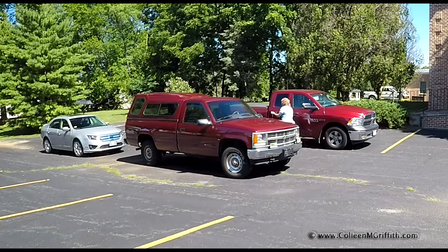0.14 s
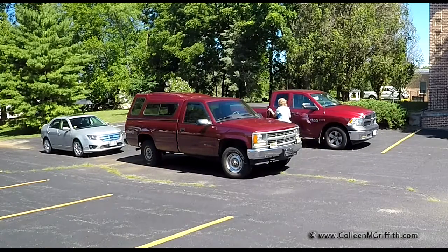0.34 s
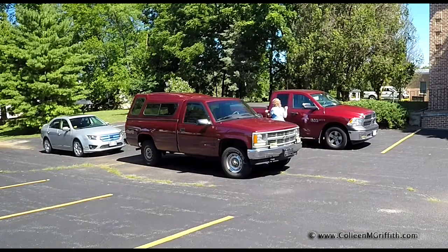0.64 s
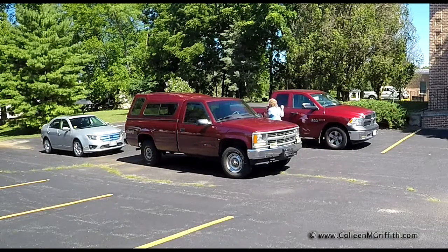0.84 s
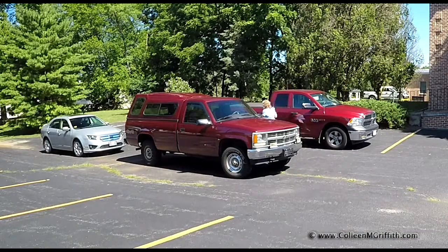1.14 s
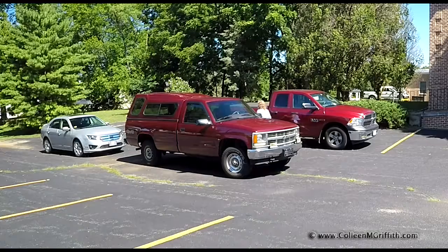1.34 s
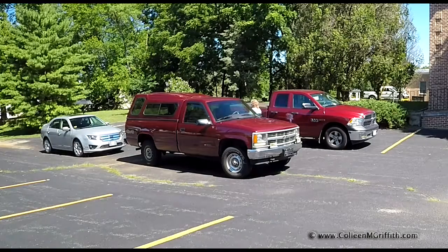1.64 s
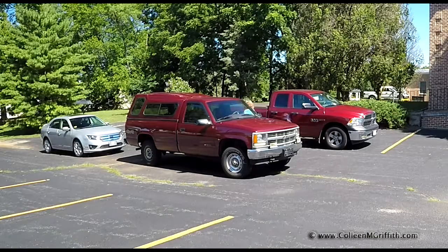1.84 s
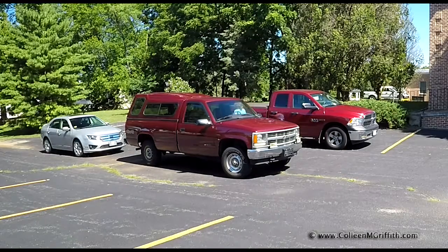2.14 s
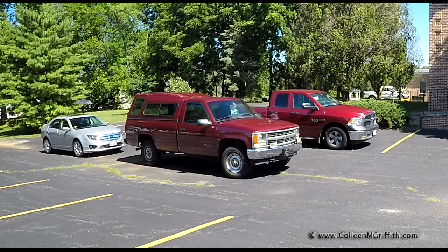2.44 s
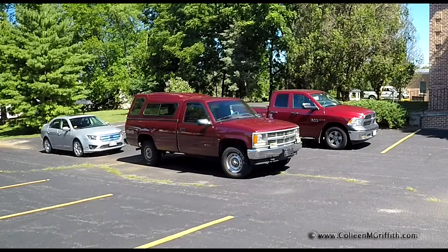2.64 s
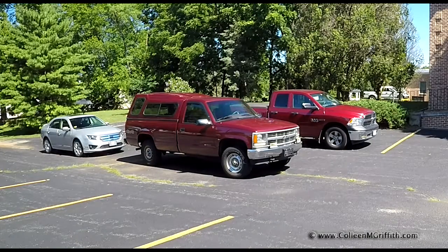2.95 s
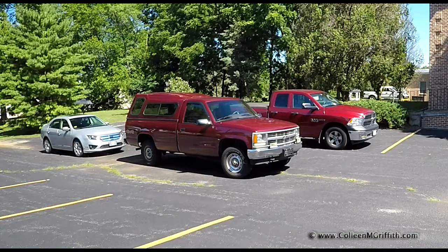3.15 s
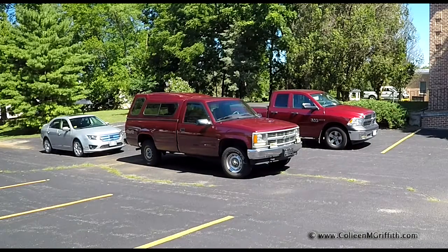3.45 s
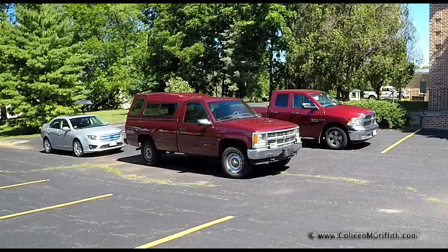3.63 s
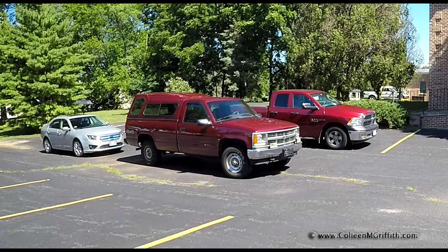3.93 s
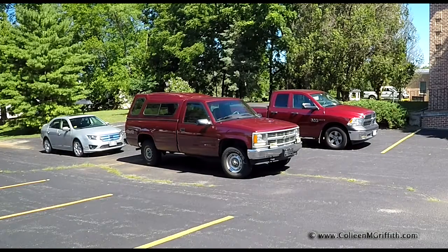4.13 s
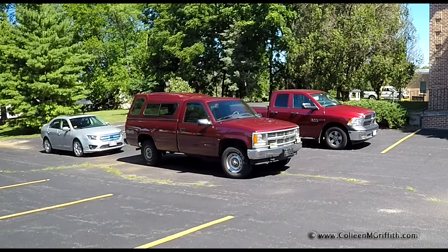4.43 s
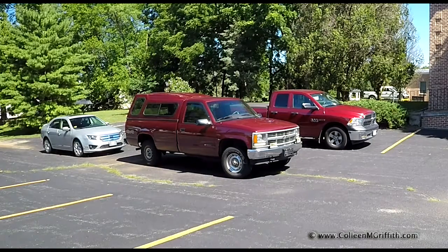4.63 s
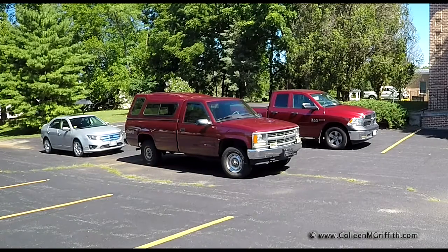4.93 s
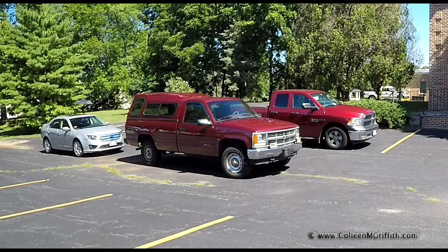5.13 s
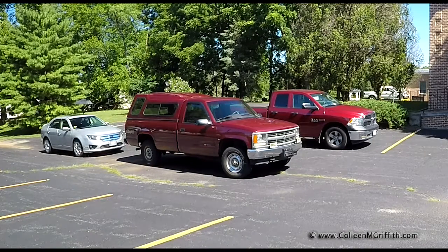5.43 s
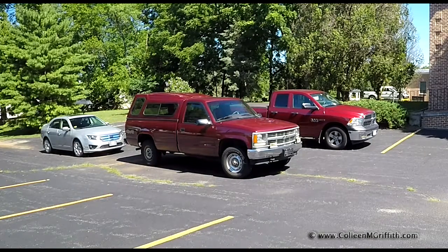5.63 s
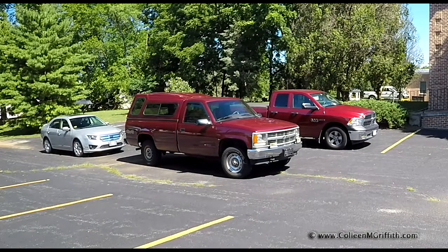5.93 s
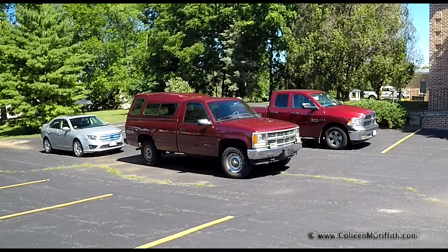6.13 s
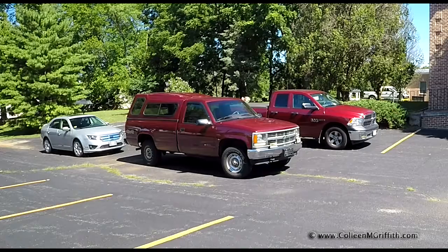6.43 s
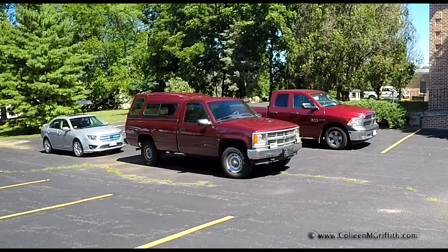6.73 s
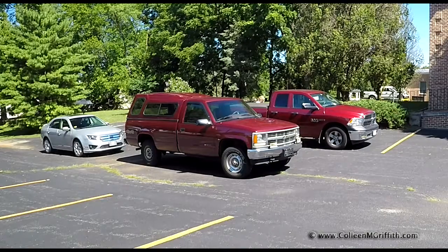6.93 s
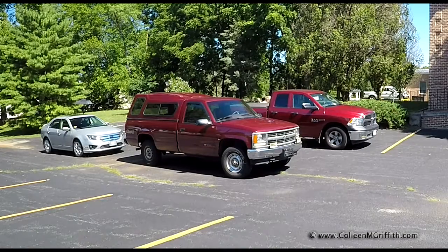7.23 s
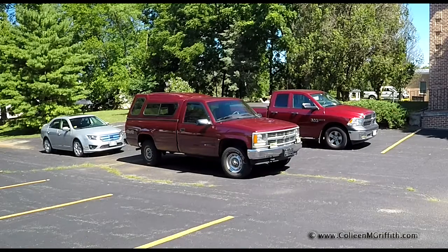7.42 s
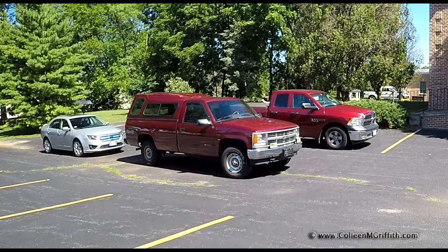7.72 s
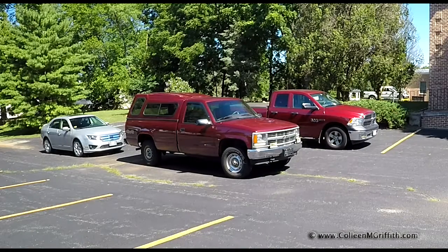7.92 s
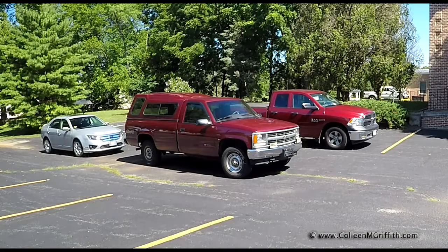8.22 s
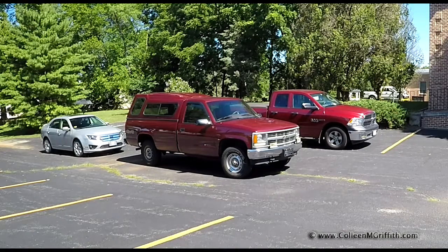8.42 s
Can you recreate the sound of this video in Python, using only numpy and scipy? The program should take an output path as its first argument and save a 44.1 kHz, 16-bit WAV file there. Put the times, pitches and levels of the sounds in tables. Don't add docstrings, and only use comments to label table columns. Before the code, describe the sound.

Outdoor stereo sound from a small camera: bassy tyre and exhaust rumble recedes, nearly vanishes around three seconds, then swells again. From five seconds an engine rises slightly in pitch, throbs unevenly past, then drops as it lifts off. Small birds give clear chirrups and quick raspy double cheeps, echoing off foliage and a wall. Dull car-body thuds mark the middle; steady leaf and microphone hiss lies over everything.

```python
import sys
import numpy as np
from scipy import signal
from scipy.fft import rfft, irfft
from scipy.io import wavfile
from scipy.ndimage import uniform_filter1d

SR = 44100
rng = np.random.default_rng(int(sys.argv[2]) if len(sys.argv) > 2 else 0)


def wrap_up_sound(samples):
    columns = np.atleast_2d(samples).T
    tamed = np.clip(columns, -1, 1)
    steps = np.round(tamed * 32767).astype(np.int16)
    wavfile.write(sys.argv[1], SR, steps)


def ratio_of_db(decibels):
    return 10 ** (np.asarray(decibels, float) / 20)


N = 377923


def evened(x):
    return x / np.sqrt(np.mean(x ** 2) + 1e-20)


def read(points, hz):
    f, *columns = np.transpose(points)
    return [np.interp(np.log(hz + 1), np.log(f + 1), column) for column in columns]


def over_time(rows, t):
    s, *columns = np.transpose(rows)
    return [np.interp(t, s, column) for column in columns]


def add(mix, s, sound):
    part = mix[round(s * SR):][:len(sound)]
    part += sound[:len(part)]


def frame_times(size):
    return np.arange(4 * N // size + 5) * size / 4 / SR


def fuzz(hz, width_hz):
    f = np.fft.rfftfreq(N, 1 / SR)
    band = 1 / (1 + ((f - hz) / width_hz * 2) ** 2)
    return evened(irfft(rfft(rng.standard_normal(N)) * band, N))


def through_ports(x, lead, balance_db):
    z = rfft(x)
    left = z * ratio_of_db(balance_db / 2) * np.exp(.5j * lead)
    right = z * ratio_of_db(-balance_db / 2) * np.exp(-.5j * lead)
    return irfft([left, right], N)


# (frequency [Hz], likeness [0-1], left lead [rad], left minus right [dB])
MICROPHONE_PORTS = [(30, .993, 0, -.6), (90, .995, 0, -.6), (260, .98, 0, -1.3), (430, .94, 0, -4),
                    (600, .85, .1, -8), (780, .55, 1.5, -10), (950, .7, 2.1, -6), (1300, .63, 2.5, -2),
                    (1800, .4, 2.2, 0), (2400, .15, 2.8, 0), (5200, .05, 2.8, 4), (6500, .05, 2.8, 1),
                    (8200, .05, 2.8, -2.5), (10000, .05, 2.8, -2), (12000, .05, 2.8, -.5)]


def diffuse(field_db, hz, size):
    same, lead, balance_db = (c[:, None] for c in read(MICROPHONE_PORTS, hz))
    same = np.clip(same, 0, .999)
    a, b, c, d = rng.standard_normal(field_db.shape[::-1] + (4,)).T
    shared, own = a + 1j * b, c + 1j * d
    left, right = ratio_of_db(balance_db / 2), ratio_of_db(-balance_db / 2)
    mean = np.sqrt(left ** 2 + right ** 2 + 2 * same * np.cos(lead)) / 2
    z = [left * np.exp(1j * lead) * shared, right * (same * shared + np.sqrt(1 - same ** 2) * own)]
    return signal.istft(z * ratio_of_db(field_db) / mean, nperseg=size, noverlap=size * 3 // 4)[1][:, :N]


# (frequency [Hz], density [dB per Hz])
HISS_SPECTRUM = [(1200, 8), (2000, 8), (2700, 3), (4000, 2.5), (5000, -1), (6200, 1.5), (7700, -0.5),
                 (8100, 1), (9200, -1.5), (10500, -3), (11500, -9.5), (13000, -12), (14500, -17),
                 (15300, -26)]


def hiss(size=512):
    hz = np.fft.rfftfreq(size, 1 / SR)
    below = -40 * np.log10(np.maximum(HISS_SPECTRUM[0][0] / (hz + 1), 1))
    spectrum_db = read(HISS_SPECTRUM, hz)[0] + below
    sound = diffuse(spectrum_db[:, None] + np.zeros(len(frame_times(size))), hz, size)
    return ratio_of_db(-60) * sound / np.std(sound.mean(0))


def whine():
    line_hz, line_db = 8631.4, -75.5
    buzz_hz, buzz_db, kicks_per_s = 8606, -67, 59.94
    t = np.arange(N) / SR
    beat = np.cos(np.pi * kicks_per_s * t)
    kicks = .25 + beat ** 4 * (1 + .45 * beat)
    line = np.sqrt(2) * np.sin(2 * np.pi * line_hz * t)
    buzz = evened(kicks * fuzz(buzz_hz, 190))
    return through_ports(ratio_of_db(line_db) * line + ratio_of_db(buzz_db) * buzz, 2.2, -5.)


# (frequency [Hz], density [dB per Hz])
WASH_SPECTRUM = [(124, -8.5), (170, -2.5), (230, -9.5), (330, -15), (480, -11.5), (620, -14.5),
                 (800, -23.5), (1130, -32), (1500, -39), (2000, -45.5)]


def wash(size=2048):
    level_db, rise_db_per_s, patch_db = -34.5, 0.24, 0.58
    hz, t = np.fft.rfftfreq(size, 1 / SR), frame_times(size)
    patches = uniform_filter1d(rng.standard_normal((len(t), len(hz))), size=8, axis=0)
    patches = evened(uniform_filter1d(patches, size=12, axis=1)).T
    below = -90 * np.log10(np.maximum(WASH_SPECTRUM[0][0] / (hz + 1), 1))
    above = -40 * np.log10(np.maximum(hz / WASH_SPECTRUM[-1][0], 1))
    spectrum_db = read(WASH_SPECTRUM, hz)[0] + below + above
    sound = diffuse(spectrum_db[:, None] + rise_db_per_s * t + patch_db * patches, hz, size)
    return ratio_of_db(level_db) * sound / np.std(sound.mean(0))


# (multiple of the shaft rate [1], level [dB rms])
HUM_PARTIALS = [(3, -49.5), (4, -43.5), (5, -47), (6, -53.5), (7, -57), (8, -52)]


def hum():
    shaft_hz = 59.37
    t = np.arange(N) / SR
    sound = np.zeros(N)
    for k, db in HUM_PARTIALS:
        steady = 8 / k * np.sin(2 * np.pi * k * shaft_hz * t)
        sound += ratio_of_db(db) * evened(steady + fuzz(k * shaft_hz, 1.04 * k + 1.2))
    return sound


# (frequency [Hz], density [dB per Hz])
RUMBLE_SPECTRUM = [(11, -37), (18, -13), (64, -0.5), (114, -3.5), (145, -4.5), (157, -3.5), (206, -12),
                   (243, -14.5), (260, -30.5), (340, -51), (570, -120)]
# (time [s], level [dB])
NEARNESS_CURVE = [(0, -29), (.5, -29), (1.1, -33.5), (1.6, -38.5), (2.2, -46.5), (3.0, -59), (3.4, -43),
                  (3.9, -38.5), (4.5, -34.5), (5.0, -33), (5.7, -31), (6.3, -32.5), (7.0, -36.5),
                  (7.6, -33.5), (8.57, -33)]


def rumble(size=4096):
    deep_db_offset, deep_follow, lumps_db = 1, 0.77, 1
    heavy_s, heavy_span_s, heavy_lift_db = 4.7, 1.1, 3.5
    hz, t = np.fft.rfftfreq(size, 1 / SR), frame_times(size)
    upper_db = over_time(NEARNESS_CURVE, t)[0]
    nearest_db = upper_db.max()
    heavy_db = heavy_lift_db * np.exp(-((t - heavy_s) / heavy_span_s) ** 4)
    deep_db = nearest_db + deep_follow * (upper_db - nearest_db) + deep_db_offset + heavy_db
    lumps = evened(uniform_filter1d(rng.standard_normal(len(t)), size=4))
    upper = 1 / (1 + (48 / (hz[:, None] + 1)) ** 6)
    above = -60 * np.log10(np.maximum(hz / RUMBLE_SPECTRUM[-1][0], 1))
    below = -60 * np.log10(np.maximum(RUMBLE_SPECTRUM[0][0] / (hz + 1), 1))
    spectrum_db = (read(RUMBLE_SPECTRUM, hz)[0] + above + below)[:, None]
    field_db = spectrum_db + (1 - upper) * deep_db + upper * upper_db + lumps_db * lumps
    return ratio_of_db(-7) * diffuse(field_db, hz, size)


def swell(length, db):
    rise_s, fade_s, sag_db_per_s = 0.017, 0.018, -9.5
    t = np.arange(0, length + fade_s, 1 / SR)
    edges = np.clip(np.minimum(t / rise_s, (t[-1] - t) / fade_s), 0, 1)
    return ratio_of_db(db + sag_db_per_s * t) * np.sin(np.pi / 2 * edges) ** 2


# (time [s], firing rate [Hz])
PASSING_SPEED = [
    (5.0, 147.1),
    (5.4, 147),
    (5.9, 151),
    (6.6, 155.1),
    (7.0, 156.1),
    (7.19, 150.8),
    (7.6, 137.4),
    (7.8, 133.6),
    (8.4, 129.5),
]
# (time [s], length [s], level [dB])
PASSING_GAPS = [(5.007, 0.27, -30.5), (5.284, 0.044, -30), (5.344, 0.29, -28), (5.684, 0.16, -32.5),
                (5.854, 0.34, -25), (6.226, 0.42, -26), (6.656, .15, -33.5), (6.84, 0.26, -31.5),
                (7.16, 0.43, -24.5), (7.697, 0.041, -27.5), (7.85, 0.47, -34)]
# (time [s], length [s], level [dB], start [Hz], end [Hz])
OTHER_ENGINES = [(0, 0.26, -32, 144.4, 143.8), (.33, 0.32, -32.5, 146.3, 143.5),
                 (.71, 0.19, -30.5, 144, 144), (.98, 0.34, -32, 143, 142.1), (1.32, 0.54, -39, 142.8, 138),
                 (0, 0.54, -30.5, 83.4, 81.8), (.59, 0.065, -34, 82.7, 82), (.69, 0.074, -35, 82, 80),
                 (.5, .17, -37.5, 168.7, 171.4), (.72, .8, -38.5, 168, 167), (1.6, 0.25, -39.5, 170, 167.4),
                 (1.95, 0.3, -37, 163.7, 165.8), (2.3, 0.73, -34.5, 167, 164.8),
                 (1.8, 0.4, -42, 406.3, 405), (2.35, .42, -44, 403, 403), (2.22, 0.074, -49, 477, 479),
                 (2.38, 0.62, -44, 472.4, 475), (4.4, 0.38, -36.5, 33, 32.5), (4.9, 0.27, -39, 31.7, 32.9),
                 (5.32, .1, -34, 37, 37), (5.75, 1.36, -36, 32.1, 25.9), (7.19, .12, -36, 170.5, 178),
                 (7.45, .3, -38, 179.2, 180), (8.3, 0.2, -34, 186.7, 175)]


def engines():
    level, others = np.zeros(N), np.zeros(N)
    for s, length, db in PASSING_GAPS:
        add(level, s, swell(length, db))
    firing_hz = over_time(PASSING_SPEED, np.arange(N) / SR)[0]
    passing = level * np.sin(2 * np.pi * np.cumsum(firing_hz) / SR)
    for s, length, db, start_hz, end_hz in OTHER_ENGINES:
        shape = swell(length, db)
        order_hz = np.linspace(start_hz, end_hz, len(shape))
        add(others, s, shape * np.sin(2 * np.pi * np.cumsum(order_hz) / SR))
    return np.sqrt(2) * (passing + others) * (1 + 0.23 * fuzz(0, 30))


def knock(db, hz, t60):
    t = np.arange(0, .15, 1 / SR)
    return ratio_of_db(db - 60 * t / t60) * np.sin(2 * np.pi * hz * t) * (1 - np.exp(-t / .003))


# (time [s], level [dB], pitch [Hz], t60 [s])
BODY_KNOCKS = [
    (3.83, -18.5, 580, 0.027),
    (3.883, -23, 525, 0.085),
    (5.074, -28.5, 700, 0.072),
]


def knocks():
    out = np.zeros(N)
    for s, *blow in BODY_KNOCKS:
        add(out, s, knock(*blow))
    return out


def note(rows, db, warble, rasp):
    t = np.arange(0, rows[-1][0], 1 / SR)
    hz, shape_db = (uniform_filter1d(c, size=50) for c in over_time(rows, t))
    throb = 1 + warble * np.sin(2 * np.pi * 135 * t) + warble * 1.3 * np.sin(2 * np.pi * 320 * t)
    drift = uniform_filter1d(rng.standard_normal((2, len(t))), size=40)
    shake, flutter = evened(uniform_filter1d(drift, size=40))
    phase = 2 * np.pi * np.cumsum(hz + 220 * rasp * shake) / SR
    voice = np.sin(phase) * (throb + rasp * flutter)
    return ratio_of_db(db + shape_db) * voice / np.sqrt(1 + rasp ** 2) * signal.windows.tukey(len(t), .15)


def cheep(db, top_hz, rise, hold):
    held = rise + hold
    path = [(0, 3150, 0), (rise, top_hz, 0), (held, .98 * top_hz, -1), (held + 0.011, 0.67 * top_hz, -9)]
    return note(path, db, .45, .28)


def slur(db, start_hz, end_hz, length, low_rasp=.4):
    rasp = .6 if start_hz > 4500 and abs(end_hz - start_hz) > 90 else low_rasp
    path = [(0, start_hz, -5), (0.537 * length, (start_hz + end_hz) / 2, 0), (length, end_hz, -3)]
    return note(path, db, 0.27, rasp)


# (time after its start [s], pitch [Hz], level [dB])
CHIRRUP_PATH = [(0, 3120, 1), (.012, 4400, -11.5), (.03, 4400, -8), (.039, 3500, -0.5), (.049, 4450, -5.5),
                (.059, 3100, -5), (.08, 3500, 3), (.09, 2950, -3), (.1, 3300, -15)]
# (time [s], level [dB], pitch factor [1], length factor [1])
CHIRRUP_CALLS = [
    (.279, -48.5, 1.014, 1.04),
    (1.903, -47, 1.03, 1.06),
    (3.585, -45, 1, 1.02),
    (5.197, -45.5, 1.0, 1.02),
    (7.249, -45, .99, 0.99),
]
# (time [s], level [dB], rise [s], level of its slurs [dB])
FIRST_CHEEPS = [
    (1.157, -57, 0.017, -59),
    (3.239, -59, .008, -55),
    (4.306, -56, 0.021, -51.5),
    (5.314, -46.5, 0.014, -47),
    (5.845, -48.5, 0.0066, -50),
    (7.185, -54.5, .013, -51),
]
# (time [s], level [dB], top [Hz], rise [s], level of its slurs [dB])
SECOND_CHEEPS = [
    (1.232, -58, 4300, .042, -59),
    (3.318, -58.5, 4830, .018, -53),
    (4.393, -53, 4430, 0.019, -56.5),
    (5.397, -49.5, 4720, .02, -48.5),
    (5.927, -53, 4830, .012, -52),
]
# (time after it [s], level [dB], start [Hz], end [Hz], length [s])
FIRST_SLURS = [
    (0.017, -9, 4790, 4750, .027),
    (0.051, -2.5, 3106, 3450, .02),
    (.052, -9.5, 5050, 5660, .034),
]
# (time after it [s], level [dB], start [Hz], end [Hz], length [s])
SECOND_SLURS = [
    (.021, -0.91, 3430, 3500, 0.019),
    (.036, -1, 3750, 3310, .012),
    (.067, 1, 2960, 3695, .025),
]
# (time [s], level [dB], start [Hz])
GRACE_NOTES = [
    (3.570, -61, 5900),
    (5.182, -61, 5900),
    (5.289, -55, 6060),
    (5.82, -59, 5750),
]
# (time [s], level [dB], start [Hz], end [Hz], length [s])
FAR_WHISTLES = [
    (6.063, -64.5, 2510, 2525, 0.065),
    (6.982, -60, 3150, 3230, .012),
    (7.022, -57.5, 3150, 3550, .165),
    (7.124, -61, 2780, 2780, .12),
    (7.322, -48, 3900, 3090, 0.017),
]


def sparrows():
    first_top_hz, first_top_s, second_top_s = 4420, 0.043, .038
    out = np.zeros(N)
    for s, db, pitch, length in CHIRRUP_CALLS:
        add(out, s, note(np.array(CHIRRUP_PATH) * [length, pitch, 1], db, .2, .2))
    cheeps = [(s, db, first_top_hz, rise, slur_db, first_top_s, FIRST_SLURS)
              for s, db, rise, slur_db in FIRST_CHEEPS]
    cheeps += [(*row, second_top_s, SECOND_SLURS) for row in SECOND_CHEEPS]
    for s, db, top_hz, rise, slur_db, top_s, slurs in cheeps:
        add(out, s, cheep(db, top_hz, rise, max(top_s - rise, .004)))
        for later, own_db, *glide in slurs:
            add(out, s + later, slur(slur_db + own_db, *glide))
    for s, db, hz in GRACE_NOTES:
        add(out, s, slur(db, hz, 0.92 * hz, .022))
    for s, *whistle in FAR_WHISTLES:
        add(out, s, slur(*whistle, low_rasp=.3))
    return out


def lot(x):
    wet_db, wall_s, wall_db = -2.4, .062, -16
    taps = rng.standard_normal((3, SR // 2)) * (rng.random((3, SR // 2)) < .06)
    hz, t, z = signal.stft(taps[:2] + 2.1 * taps[2], SR, nperseg=128)
    t60 = read([(3200, .62), (4400, .58), (5500, .33)], hz)[0]
    decay = ratio_of_db(-60 * t / t60[:, None]) * (t > .006)
    tail = signal.istft(z * decay, SR, nperseg=128)[1]
    band = (hz > 2800) & (hz < 5000)
    tail *= ratio_of_db(wet_db) / np.linalg.norm(tail[0]) * np.sqrt(np.mean(t60) / np.mean(t60[band]))
    tail[:, round(wall_s * SR)] += ratio_of_db(wall_db)
    return signal.fftconvolve(x, tail, axes=1)[:, :N]


# (frequency [Hz], left lead [rad], left minus right [dB])
TREE_DIRECTION = [(2800, -0.82, -7), (3450, 0.17, 1.5), (3900, -1, 2), (4300, -1.2, 8), (4750, 0.28, 6),
                  (5500, 0.81, 15.5)]


def birds_in_trees():
    birds = through_ports(sparrows(), *read(TREE_DIRECTION, np.fft.rfftfreq(N, 1 / SR)))
    return birds + lot(birds)


def scene():
    lead, balance_db = read(MICROPHONE_PORTS, np.fft.rfftfreq(N, 1 / SR))[1:]
    near = through_ports(hum() + engines() + knocks(), lead, balance_db)
    return hiss() + whine() + wash() + rumble() + near + birds_in_trees()


def top_cut(x):
    return signal.sosfilt(signal.butter(12, 14900, fs=SR, output="sos"), x)


def record(dry):
    return top_cut(dry)


dry = scene()
out = record(dry)
wrap_up_sound(out)
```